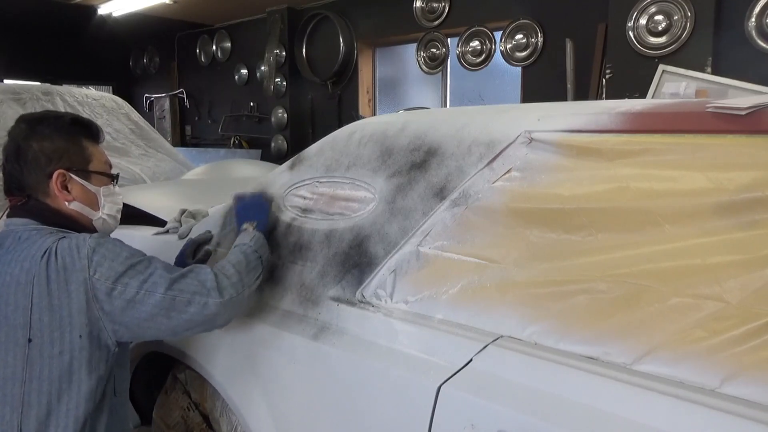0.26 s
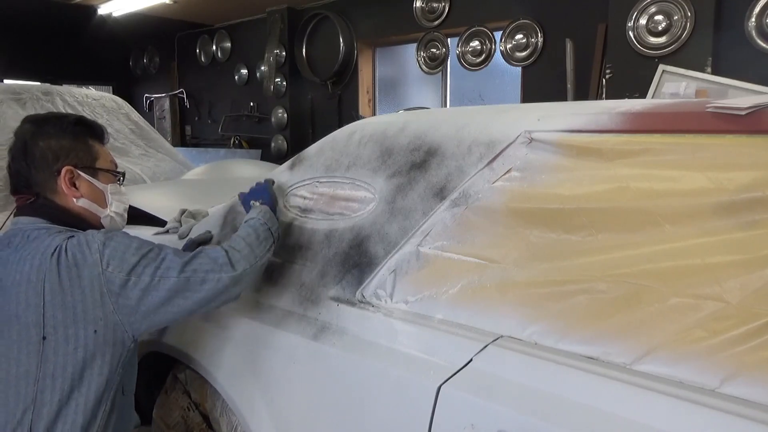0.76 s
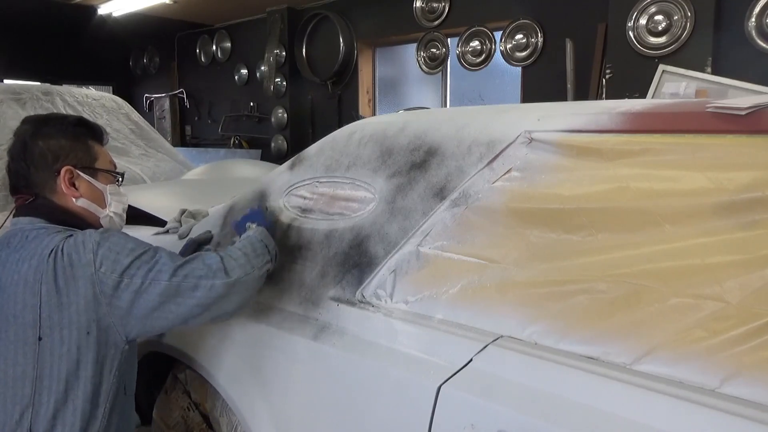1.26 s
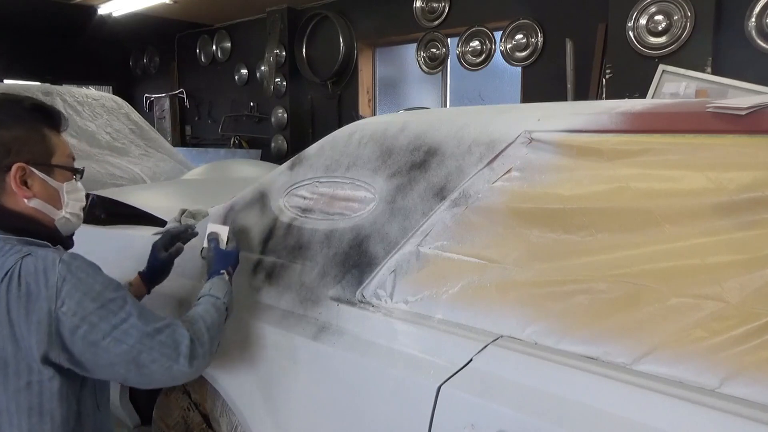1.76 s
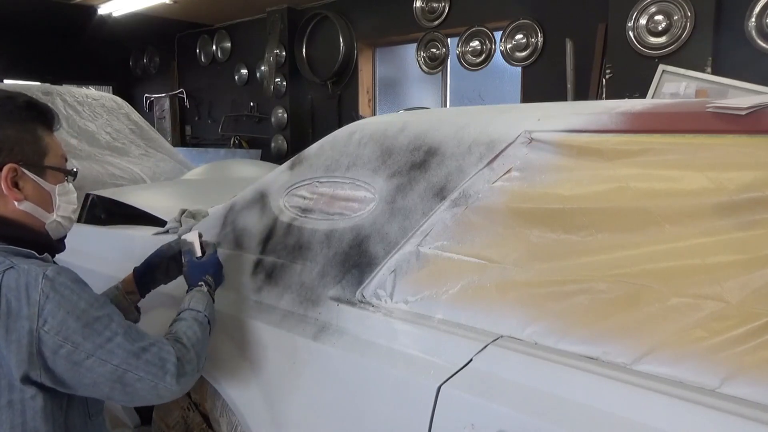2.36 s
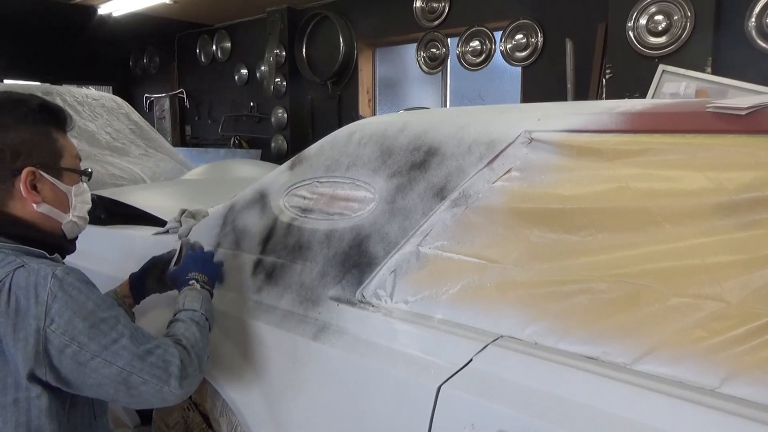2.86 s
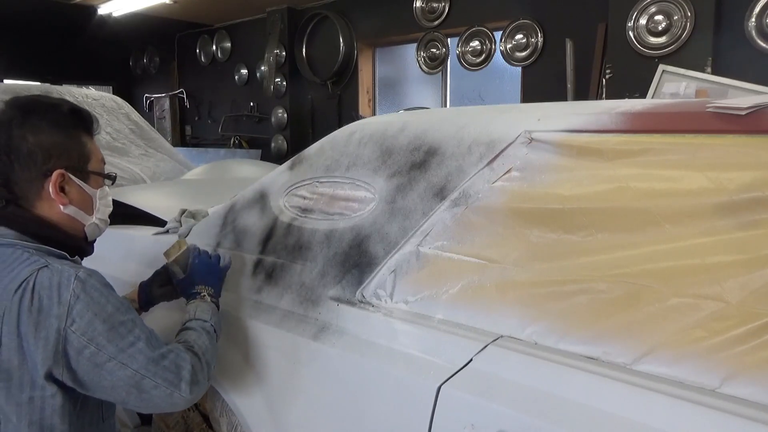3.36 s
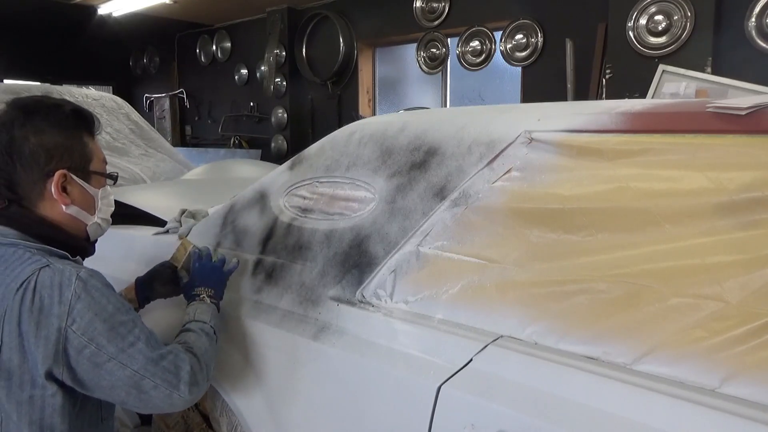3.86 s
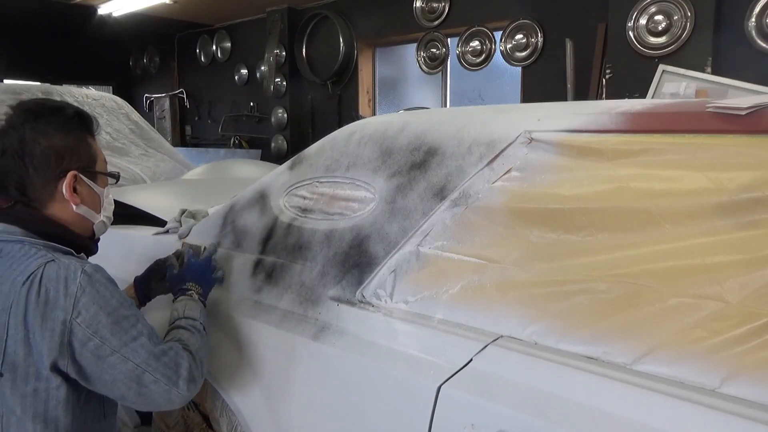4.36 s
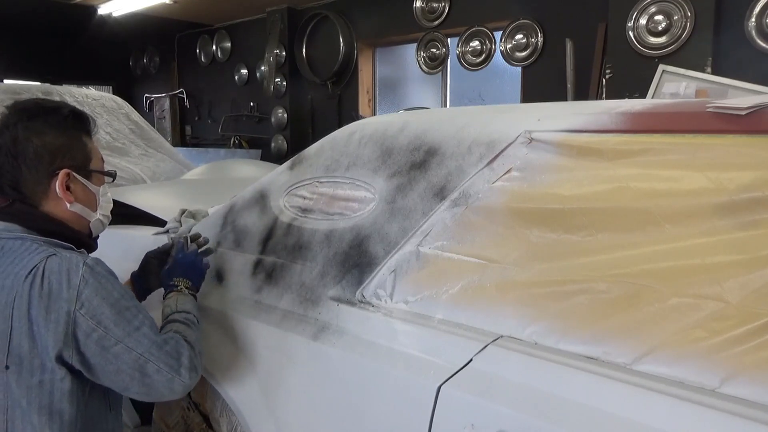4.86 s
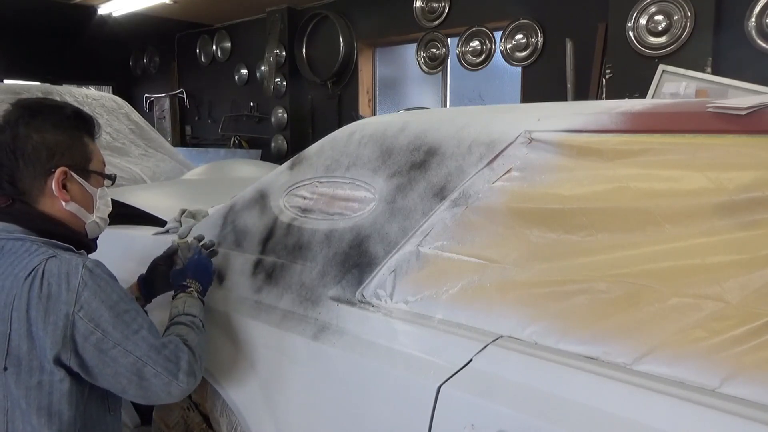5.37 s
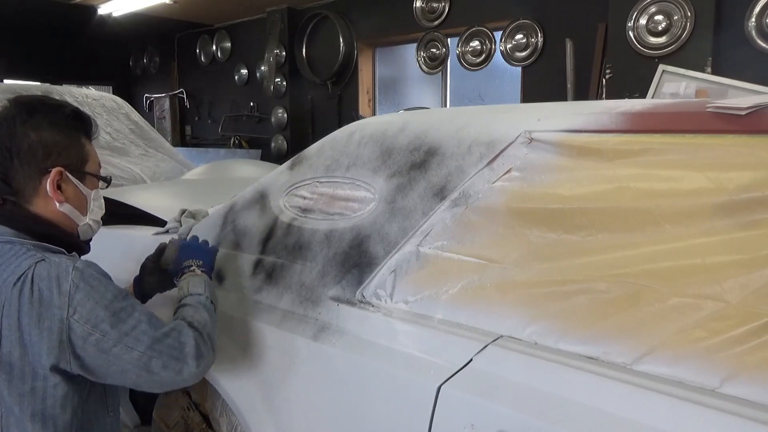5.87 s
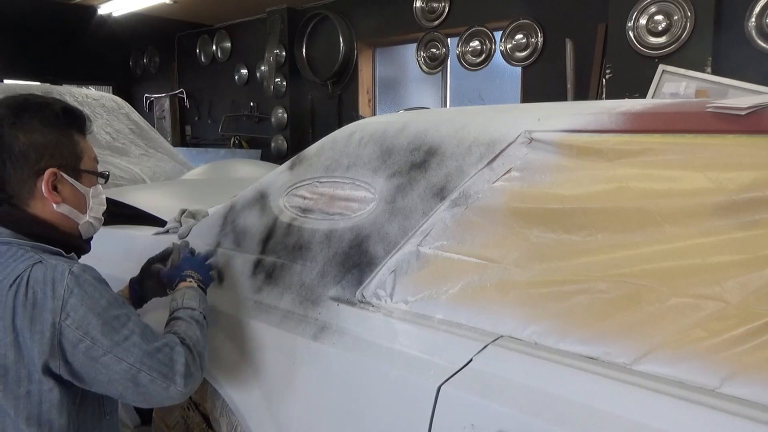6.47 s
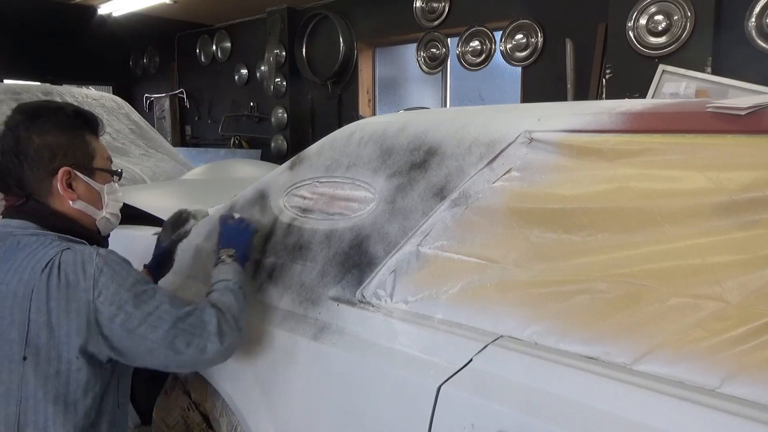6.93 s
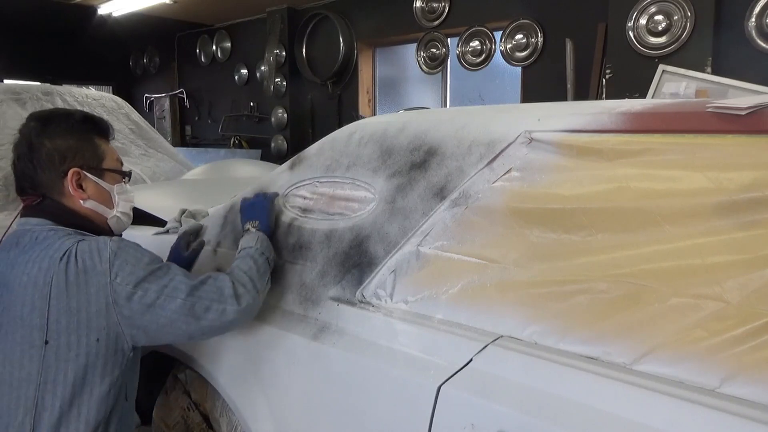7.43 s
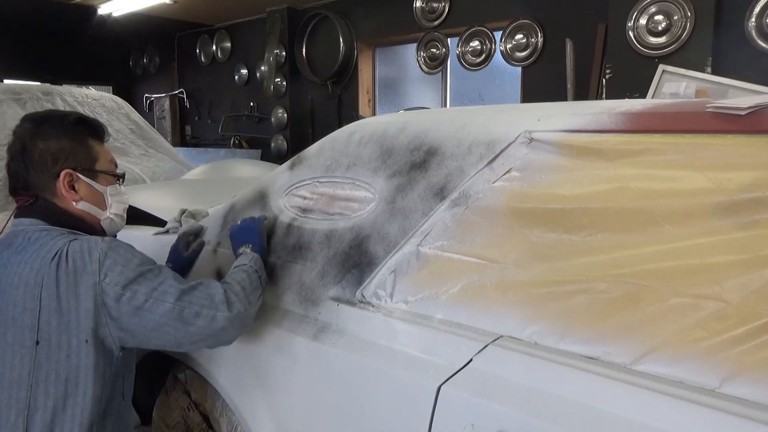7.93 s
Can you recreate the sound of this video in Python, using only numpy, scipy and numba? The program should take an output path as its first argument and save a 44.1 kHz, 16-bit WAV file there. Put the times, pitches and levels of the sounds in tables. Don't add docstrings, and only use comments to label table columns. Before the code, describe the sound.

Close in a small, hard-walled garage, a wrapped block rubs gritty strokes across primed metal, then stops. Stiff abrasive paper is shifted between gloves: faint scuffs, flicks, brief slides and crisp pops, busiest around the middle and again before the final strokes. A low, smooth exhaust hum rises and falls in pitch behind it, pulsing and fading, with steady road rumble. Brisk back-and-forth sanding closes the scene.

```python
import sys
import numpy as np
from scipy import signal
from scipy.fft import rfft, irfft
from scipy.io import wavfile
from scipy.ndimage import uniform_filter1d
from numba import njit

SR = 44100
rng = np.random.default_rng(int(sys.argv[2]) if len(sys.argv) > 2 else 0)


def unload_audio(sound):
    columns = np.transpose(np.atleast_2d(sound))
    steps = np.round(np.clip(columns, -1, 1) * 32767)
    wavfile.write(sys.argv[1], SR, steps.astype(np.int16))


def attenuation_scalar(level_db):
    decades = np.asarray(level_db, float) / 20
    return 10 ** decades


N = 361619
TIME = np.arange(N) / SR


def unit(x):
    return x / np.sqrt(np.mean(x ** 2))


def curves(table):
    s, *columns = np.transpose(table)
    return [np.interp(TIME, s, column) for column in columns]


def walk(rate_hz):
    hold = int(SR / rate_hz)
    steps = np.repeat(rng.standard_normal(N // hold + 1), hold)
    return 1.6 * uniform_filter1d(uniform_filter1d(steps, hold), hold)[:N]


def resonate(x, hz, width_hz):
    b, a = signal.iirpeak(hz, hz / width_hz, fs=SR)
    return signal.lfilter(b, a, signal.lfilter(b, a, x))


def ring(size, modes):
    total = np.zeros(N)
    for hz, width_hz, db in modes:
        strikes = size * rng.standard_normal(N)
        total += attenuation_scalar(db) * unit(resonate(strikes, hz, width_hz))
    return unit(total)


def grit(scatter_db, patchy_db):
    return attenuation_scalar(scatter_db * rng.exponential(size=N) + patchy_db * walk(180))


def arch(start, length, top):
    span = slice(max(int(start * SR), 0), min(int((start + length) * SR), N))
    share = np.clip((TIME[span] - start) / length, 0, 1)
    bend = np.log(0.5) / np.log(np.clip(top, 0.2, 0.8))
    return span, np.abs(np.sin(np.pi * share ** bend))


# f/Hz, width/Hz, level/dB
BLOCK_MODES = [(4450, 2200, 3.7), (6120, 1970, 8.9), (6820, 1800, 2.9)]
# f/Hz, width/Hz, level/dB
GRIT_MODES = [(8080, 2400, 0.46), (9330, 1840, -0.32), (10540, 1900, -1.4)]


def rubbed(drive, size, body_modes):
    return sum(d * ring(size, modes) for d, modes in zip(drive, (body_modes, BLOCK_MODES, GRIT_MODES)))


# t/s, length/s, block level/dB, share of the stroke before top speed [0-1]
STROKES = [(-0.08, 0.18, -17, 0.17), (0.082, 0.2, -23, 0.42), (0.645, 0.21, -21.5, 0.49),
           (0.845, 0.19, -23.5, 0.49), (1.025, 0.18, -22, 0.33), (1.182, 0.2, -22.5, 0.43),
           (7.31, 0.19, -22.5, 0.48), (7.481, 0.17, -22.5, 0.61), (7.653, 0.2, -24.5, 0.27),
           (7.823, 0.17, -23, 0.45), (7.985, 0.2, -23.5, 0.32), (8.153, 0.22, -17, 0.51)]
# number of strokes, panel level/dB and grit level/dB against the block
BOUTS = [
    (2, -9.5, 0.5),
    (4, -9, -4.5),
    (6, -6.5, 1),
]
# f/Hz, width/Hz, level/dB
PANEL_MODES = [(1200, 1270, 16.5), (2300, 1400, 16.5), (3040, 1400, 17)]


def strokes():
    drive = np.zeros((3, N))
    steepness = np.array([[1.1], [1.3], [1.6]])
    patches = [patch for count, *patch in BOUTS for _ in range(round(count))]
    for (start, length, db, top), (panel_db, grit_db) in zip(STROKES, patches):
        span, speed = arch(start, length, top)
        level_db = db + np.array([[panel_db], [0], [grit_db]])
        drive[:, span] += attenuation_scalar(level_db) * (0.012 + speed) ** steepness
    uneven_pressure = attenuation_scalar(1.1 * walk(40))
    return rubbed(drive * uneven_pressure, grit(scatter_db=1.5, patchy_db=0.35), PANEL_MODES)


# t/s, length/s, hiss level/dB, share before top speed [0-1], mode f/Hz
SLACK_SLIDES = [
    (3.241, 0.11, -45.5, 0.35, 2850),
    (4.154, 0.3, -44.5, 0.1, 2240),
    (4.765, 0.15, -42, 0.32, 2770),
    (5.537, 0.14, -42, 0.1, 2110),
]
# t/s, length/s, hiss level/dB, share before top speed [0-1], mode f/Hz
TAUT_SLIDES = [
    (2.465, 0.18, -41.5, 0.71, 2300),
    (3.809, 0.12, -51.5, 0.26, 3060),
    (6.817, 0.06, -37, 0.65, 2870),
]


def slides():
    taut_mode_db, slack_mode_db = 3, -4
    rings_above_hz = 2500
    size = grit(scatter_db=2.0, patchy_db=1.6)
    hiss = ring(size, BLOCK_MODES) + attenuation_scalar(-4.5) * ring(size, GRIT_MODES)
    out = np.zeros(N)
    grips = [(*row, taut_mode_db) for row in TAUT_SLIDES] + [(*row, slack_mode_db) for row in SLACK_SLIDES]
    for start, length, db, top, mode_hz, mode_db in grips:
        span, speed = arch(start, length, top)
        out[span] += attenuation_scalar(db) * speed ** 1.5 * hiss[span]
        strikes = size[span] * rng.standard_normal(len(speed))
        mode = unit(resonate(strikes, mode_hz, 0.55 * mode_hz))
        mode = np.pad(attenuation_scalar(db + mode_db) * speed ** 0.8 * mode, (0, 8000))
        ringing = signal.lfilter(*signal.iirpeak(mode_hz, 250, fs=SR), mode)
        out[span.start:span.start + len(mode)] += mode + attenuation_scalar(4) * ringing * (mode_hz > rings_above_hz)
    return out


# t/s, peak level/dB, low mode f/Hz, high mode level/dB against the low, slip time/s
SNAPS = [(1.516, -48, 1790, 2, 0.00091), (1.5262, -22.5, 2020, -3, 0.00071),
         (2.614, -19.5, 2070, -10, 0.0052), (4.374, -16.5, 2300, 6.5, 0.0011),
         (4.525, -10.5, 2480, -5, 0.00205), (4.527, -10, 3140, 1, 0.00097), (4.803, -15, 2800, 22, 0.002),
         (5.104, -25, 2860, 1, 0.0077), (6.4385, -13, 2520, 1, 0.0021), (6.853, -18, 2700, -3, 0.0022),
         (7.111, -34, 2000, -1, .002), (7.124, -22, 2500, 3, 0.0031), (7.137, -22, 3000, 9, 0.0025),
         (7.566, -10.5, 2200, 18, .006), (7.671, -6, 1400, 12, 0.00282)]
# t/s, peak level/dB, low mode f/Hz, high mode level/dB, slip time/s
PINGS = [
    (3.5, -19, 2770, -9, 0.0025),
    (6.437, -15.5, 1580, 1.1, 0.0025),
]


def snaps():
    high_hz = 6500
    let_go = 3.0
    out, late = np.zeros(N), np.arange(int(0.03 * SR)) / SR
    # low mode width per Hz, level of its broad overtone/dB
    sheets = [(*row, 0.4, -8) for row in SNAPS] + [(*row, 0.12, -20) for row in PINGS]
    for s, db, low_hz, high_db, slip_s, width, upper_db in sheets:
        slips = rng.standard_normal(len(late)) * np.sin(np.pi * np.clip(late / slip_s, 0, 1))
        slips[int(slip_s * SR / 4)] += let_go
        after = slips + attenuation_scalar(-13) * rng.standard_normal(len(late)) * np.exp(-late / 0.006)
        low = resonate(after, low_hz, width * low_hz)
        low += attenuation_scalar(upper_db) * resonate(after, 1.52 * low_hz, 0.94 * low_hz)
        high = resonate(slips, high_hz, 0.6 * high_hz)
        sound = unit(low) + attenuation_scalar(high_db) * unit(high)
        i = int(s * SR)
        out[i:i + len(late)] += attenuation_scalar(db) * sound / np.abs(sound).max()
    return out


# t/s, level/dB, rise/s, fall/s, sheet level/dB against the block
SCUFFS = [(0.602, -53.5, 0.019, 0.012, 2), (2.116, -43.5, 0.014, 0.022, 3), (2.253, -45, 0.035, 0.05, -1.5),
          (2.792, -52.5, 0.033, 0.042, 3), (2.934, -50, 0.031, 0.046, 0), (3.09, -48.5, 0.05, 0.051, -6),
          (3.268, -49, 0.011, 0.087, -3), (3.401, -55, 0.026, 0.035, 5), (3.465, -48.5, 0.029, 0.019, 3),
          (3.725, -48, 0.02, 0.013, -2), (3.936, -47, 0.044, 0.014, 4), (4.049, -51, 0.049, 0.039, -1),
          (4.229, -52.5, 0.049, 0.039, 4), (4.666, -34.5, 0.0085, 0.02, 1), (5.381, -53.5, 0.018, 0.04, 0),
          (5.587, -52, 0.016, 0.022, 10), (5.636, -34.5, 0.013, 0.0054, -7.5), (5.892, -55, 0.034, 0.11, 4),
          (6.077, -55, 0.064, 0.015, 1), (6.415, -43, 0.016, 0.005, -11),
          (6.585, -36.5, 0.022, 0.0053, -13), (6.651, -42.5, 0.03, 0.014, 1),
          (6.854, -41.5, 0.058, 0.033, -4), (7.138, -40, 0.012, 0.033, -4.5)]
# t/s, level/dB, fall/s, sheet level/dB against the block
FLICKS = [(0.367, -48, 0.0091, -5), (2.36, -53, 0.066, -6), (2.699, -45.5, 0.008, -9),
          (2.984, -57, 0.003, 0.1), (3.024, -50, 0.0092, -4), (4.415, -33.5, 0.011, -7.5),
          (4.481, -47, 0.005, -3), (4.504, -47, 0.0073, 2.1), (4.589, -44, 0.044, -5),
          (4.782, -41, 0.0025, -9), (4.806, -43.5, 0.073, 2.5), (4.844, -40, 0.003, -6),
          (4.954, -61, 0.003, -3), (5.208, -32, 0.01, -3.5), (5.824, -48, 0.0026, -5),
          (6.304, -52, 0.061, 1), (6.804, -48, 0.003, 1.1), (7.03, -54, 0.009, -7)]
# t/s, level/dB
GLOVES = [(1.4, -34), (1.46, -53), (1.63, -61.5), (1.86, -73), (2.3, -80), (2.5, -52), (3.04, -63.5),
          (3.3, -48), (3.55, -61), (4.35, -56.5), (4.9, -58), (5.66, -75), (6.33, -54.5), (6.46, -49),
          (6.74, -64), (7.18, -56), (7.3, -70)]
# f/Hz, width/Hz, level/dB
SHEET_MODES = [(1680, 1400, 1), (2300, 770, -1), (2750, 760, 1), (3630, 1400, -0.5)]


def handling():
    flick_rise_s, flick_grit_db, scuff_grit_db = 0.0045, -6, -3.5
    gloves_on = np.clip((TIME - GLOVES[0][0]) / 0.1, 0, 1)
    glove_db = curves(GLOVES)[0] + 2.0 * walk(25)
    power = (gloves_on * attenuation_scalar(glove_db + np.array([[-2], [0], [-5]]))) ** 2
    moves = [(s, db, flick_rise_s, fall, sheet_db, flick_grit_db) for s, db, fall, sheet_db in FLICKS]
    moves += [(*row, scuff_grit_db) for row in SCUFFS]
    for s, db, rise, fall, sheet_db, grit_db in moves:
        i, j = int((s - 0.15) * SR), int((s + 0.25) * SR)
        late = TIME[i:j] - s
        shape = np.exp(np.where(late < 0, 1.24 * late / rise, -1.6 * late / fall))
        level_db = db + 3.5 + np.array([[sheet_db], [0], [grit_db]])
        power[:, i:j] += (attenuation_scalar(level_db) * shape) ** 2
    colour = attenuation_scalar(1.3 * np.array([walk(14) for _ in power]))
    return rubbed(colour * np.sqrt(power), grit(scatter_db=1.8, patchy_db=2.0), SHEET_MODES)


def near_echoes(x):
    late = np.arange(int(0.04 * SR)) / SR
    fade = np.exp(-late / 0.014) * np.clip(late / 0.002, 0, 1)
    echoes = attenuation_scalar(-38) * rng.standard_normal(len(late)) * fade
    echoes[int(0.0055 * SR)] = attenuation_scalar(-9)
    dull = signal.sosfilt(signal.butter(1, 6000, fs=SR, output="sos"), x)
    return x + signal.fftconvolve(dull, echoes)[:N]


def ports(x):
    late = np.arange(1500) / SR
    spray = unit(rng.standard_normal(len(late)) * np.exp(-late / 0.01)) / np.sqrt(len(late))
    scatter = np.convolve(x, spray)[:N]
    scatter = attenuation_scalar(-14) * signal.sosfilt(signal.butter(1, 1500, "high", fs=SR, output="sos"), scatter)
    return np.array([attenuation_scalar(0.2) * x + scatter, attenuation_scalar(-0.87) * x - scatter])


@njit
def walls(x, lags, gain, damp):
    line, soft, out = np.zeros((8, 4096)), np.zeros(8), np.zeros((2, len(x)))
    for i in range(len(x)):
        total = 0.
        for k in range(8):
            soft[k] += (1 - damp) * (gain[k] * line[k, (i - lags[k]) & 4095] - soft[k])
            total += soft[k]
            out[k % 2, i] += soft[k]
        for k in range(8):
            line[k, i & 4095] = x[i] + soft[k] - total / 4
    return out


def garage(work):
    t60_s = 0.46
    lags = (300 * 1.3 ** np.arange(8) + rng.integers(0, 60, 8)).astype(np.int64)
    tail = walls(work + 1e-18, lags, attenuation_scalar(-60 * lags / SR / t60_s), 0.27)
    shared = tail.mean(axis=0)
    return attenuation_scalar(-14.5) * (shared + 0.32 * (tail - shared))


# t/s, firing f/Hz
FIRING = [(0, 158.9), (.3, 158.1), (.8, 153.3), (1.4, 153.3), (2.0, 154.7), (2.6, 161.3), (3.0, 166.9),
          (4.0, 179.9), (4.6, 185.1), (4.9, 186.5), (5.05, 185.6), (5.3, 181.9), (6.2, 174.5),
          (6.45, 171.1), (7.15, 165.6), (7.4, 167.7), (8.2, 172.3)]
# t/s, level/dB
FIRING_DB = [(0, -42), (.55, -34.5), (.95, -31.5), (1.27, -29.5), (1.85, -22.5), (2.5, -21), (2.9, -22.5),
             (3.74, -22.5), (4.3, -22), (4.85, -23.5), (5.15, -34), (6.0, -29.5), (6.3, -33), (6.85, -33.5),
             (7.26, -27.5), (7.45, -19.5), (7.8, -18), (8.2, -20.5)]
# t/s, depth/dB, half width/s
FADES = [(.74, -5.5, 0.075), (1.05, -15, 0.078), (2.665, -21, 0.091), (3.09, -4.5, .14), (3.4, -3, 0.079),
         (3.92, -9, 0.14), (4.41, -2.5, 0.048), (4.68, -4.5, 0.06), (5.09, -10, 0.071), (5.39, -8.5, 0.11),
         (5.82, -9.5, 0.067), (6.44, -26, 0.16), (6.6, -1, .04), (6.8, -13, 0.13), (7.34, -17, 0.044),
         (8.05, -2.5, .1)]
# t/s, level/dB
LOAD = [(0, -52), (.55, -45), (.85, -56), (2.9, -44), (3.4, -58), (6.1, -52), (6.75, -38), (7.3, -50.5),
        (8.0, -31.5), (8.2, -38)]
# t/s, level/dB
UNEVEN = [(0, -56), (3.1, -61), (3.4, -50), (4.7, -56), (5.0, -41), (5.25, -46), (6.0, -49), (6.8, -47),
          (7.4, -42.5), (8.2, -45)]
# t/s, left minus right level/dB
ENGINE_PAN = [(0, 6), (2.6, 1.5), (2.95, 7), (3.54, -0.5), (3.95, 5.5), (4.2, -0.5), (5.05, -1.5),
              (6.4, 3.5), (6.75, 0.5), (7.49, 6), (8.2, 0.6)]
# t/s, share of the firing rate
MIRROR_SHARE = [(0, .93), (2.8, .93), (3.1, .911), (4.2, .906), (5.2, .935), (8, .921), (8.2, .93)]
# t/s, level/dB
MIRROR_DB = [(0, -59), (2.4, -40), (2.85, -37.5), (3.2, -27.5), (4, -32), (4.2, -38), (4.4, -28.5),
             (5.6, -41.5), (6.6, -42), (7.6, -34), (7.8, -20.5), (8, -28.5), (8.2, -30)]


def engine():
    hz, pan_db = curves(FIRING)[0], curves(ENGINE_PAN)[0]
    fades = np.ones(N)
    for s, db, width in FADES:
        fades *= 1 - (1 - attenuation_scalar(db)) * np.exp(-((TIME - s) / width) ** 2)
    order15_db = curves(UNEVEN)[0] + 1.6 * walk(4)
    order2_db = curves(LOAD)[0] + 1.4 * walk(4)
    phase = 2 * np.pi * np.cumsum(hz * (1 + 0.002 * walk(12))) / SR
    tone = fades * attenuation_scalar(curves(FIRING_DB)[0]) * np.sin(phase)
    tone += attenuation_scalar(order15_db) * np.sin(3 / 2 * phase)
    tone += attenuation_scalar(order2_db) * (np.sin(2 * phase) + attenuation_scalar(-13.5) * np.sin(5 / 2 * phase))
    echo_hz = hz * curves(MIRROR_SHARE)[0] * (1 + 0.004 * walk(9))
    echo_phase = 2 * np.pi * np.cumsum(echo_hz) / SR
    echo_db = curves(MIRROR_DB)[0] + 1.8 * walk(9)
    echo = attenuation_scalar(echo_db) * np.sin(echo_phase + np.array([[0.15], [-0.15]]))
    return np.sqrt(2) * (tone * attenuation_scalar(np.array([pan_db, -pan_db]) / 2) + echo)


# f/Hz, level/dB per Hz
ROAD = [(15, -36), (30, -12), (75, -3.5), (130, -6.5), (200, -6.5), (290, -5), (420, -12), (550, -9),
        (800, -14), (1400, -20.5), (2200, -28), (3400, -38), (6000, -39), (11000, -45.5)]
# t/s, level/dB
SWELL = [(0, -35), (.5, -34.5), (1.5, -37), (2.8, -34.5), (3.6, -36.5), (4.7, -34.5), (5.4, -37.5),
         (6, -34), (7, -33), (7.8, -30.5), (8.2, -32)]
# t/s, level/dB against the swell
TYRES = [(0, 2), (1.3, 0.5), (2.5, 2.5), (4, 0.6), (5.7, -0.2), (6.3, -1.3), (7.15, -0.5), (7.7, 0.5),
         (8.2, -1.8)]


def road():
    hz = np.maximum(np.fft.rfftfreq(N, 1 / SR), 1)
    road_hz, road_db = np.transpose(ROAD)
    colour = attenuation_scalar(np.interp(np.log(hz), np.log(road_hz), road_db))
    spectrum = rfft(rng.standard_normal((2, N))) * colour
    spectrum /= np.std(irfft(spectrum[0], N))
    deep = 1 / (1 + (hz / 125) ** 6)
    hiss = 1 - 1 / (1 + (hz / 1800) ** 4)
    middle = 1 - deep - hiss
    roar = 1 / (1 + (380 / hz) ** 6)
    swell_db = curves(SWELL)[0]
    parts = [(deep, -37 + 0.63 * TIME),
             (middle * (1 - roar), swell_db),
             (middle * roar, swell_db + curves(TYRES)[0]),
             (hiss, -36)]
    mid, side = sum(irfft(spectrum * share, N) * attenuation_scalar(db) for share, db in parts)
    left = attenuation_scalar(1.23) * (mid + attenuation_scalar(-13) * side)
    right = attenuation_scalar(-0.75) * (mid - attenuation_scalar(-21) * side)
    return np.array([left, right])


def scene():
    work = near_echoes(strokes() + slides() + handling() + snaps())
    return ports(work) + garage(work) + engine() + road()


def roll_off(x):
    return signal.sosfilt(signal.butter(12, 12340, fs=SR, output="sos"), x)


def record(dry):
    cut = signal.sosfilt(signal.butter(2, 30, "high", fs=SR, output="sos"), dry)
    mix = signal.sosfilt(signal.ellip(10, 0.3, 55, 11000, fs=SR, output="sos"), cut)
    return roll_off(mix)


dry = scene()
out = record(dry)
unload_audio(out)
```